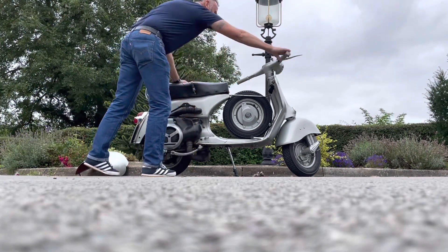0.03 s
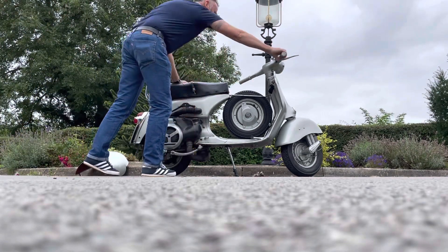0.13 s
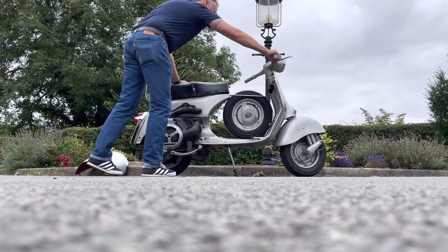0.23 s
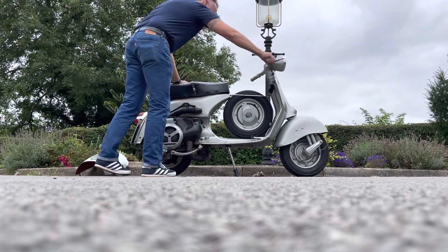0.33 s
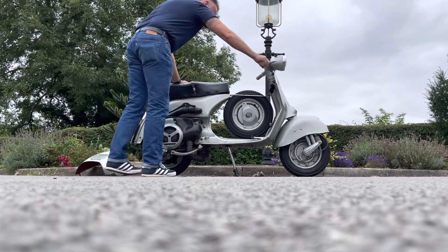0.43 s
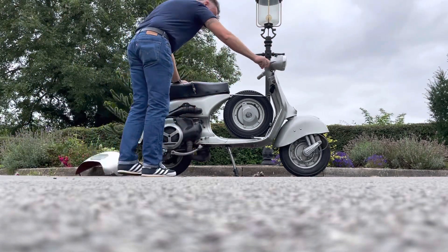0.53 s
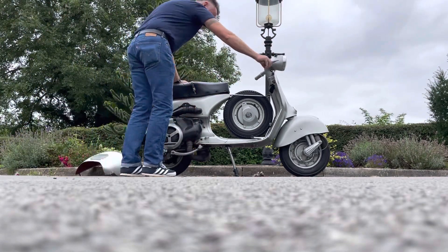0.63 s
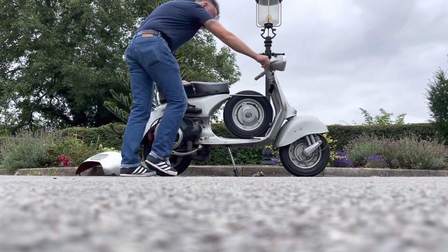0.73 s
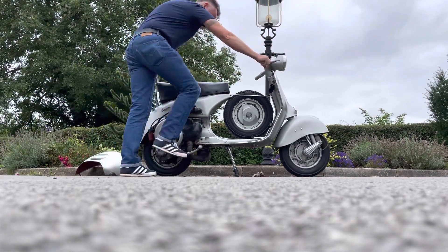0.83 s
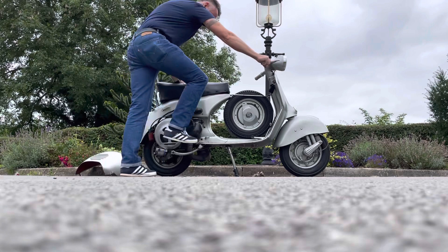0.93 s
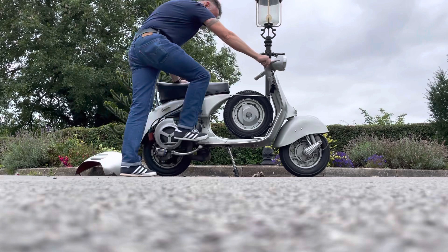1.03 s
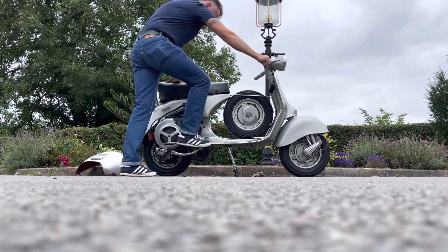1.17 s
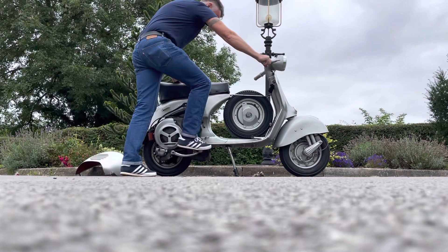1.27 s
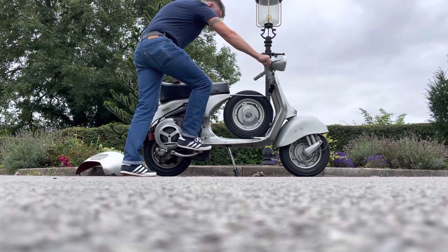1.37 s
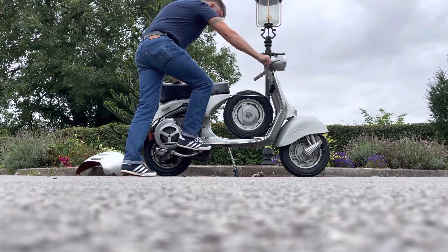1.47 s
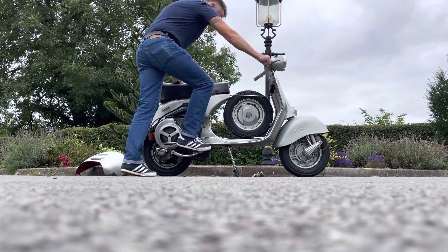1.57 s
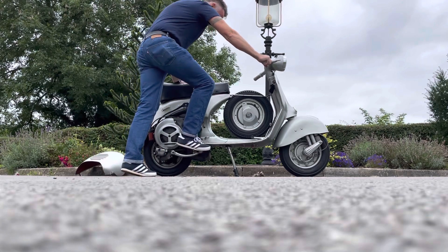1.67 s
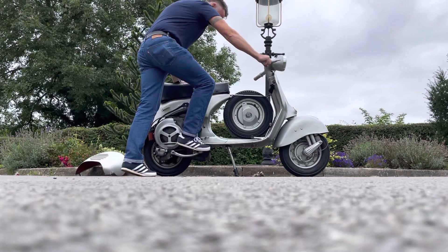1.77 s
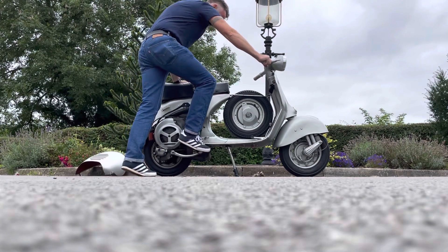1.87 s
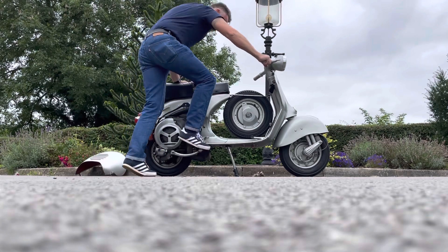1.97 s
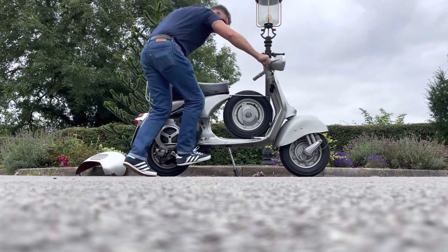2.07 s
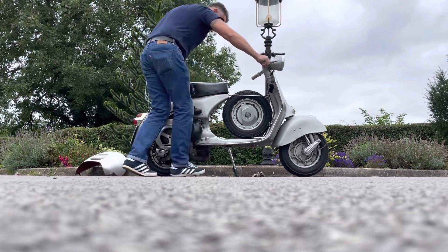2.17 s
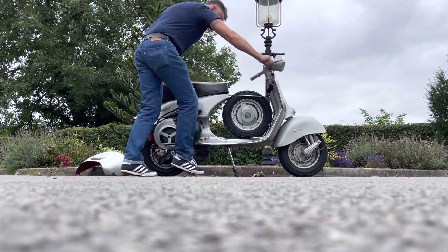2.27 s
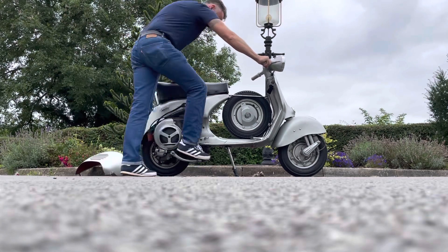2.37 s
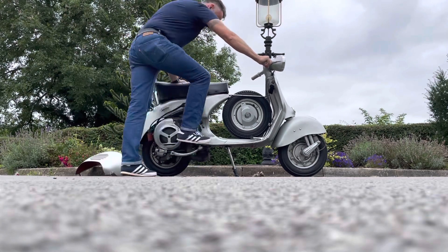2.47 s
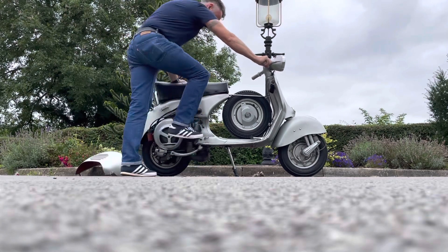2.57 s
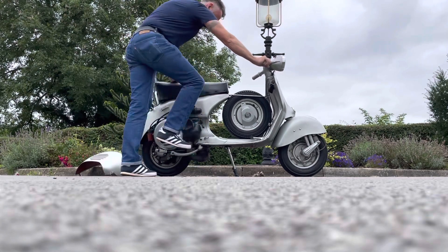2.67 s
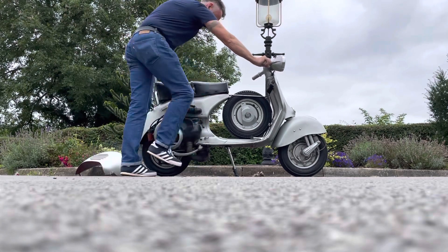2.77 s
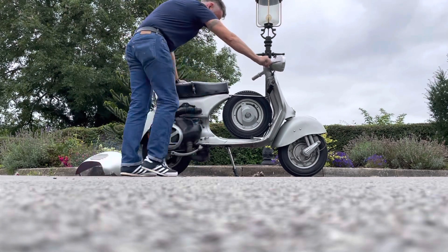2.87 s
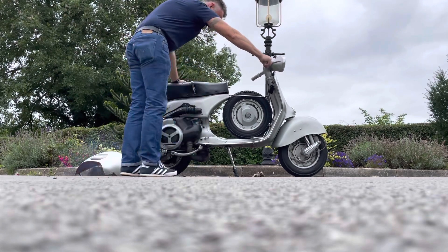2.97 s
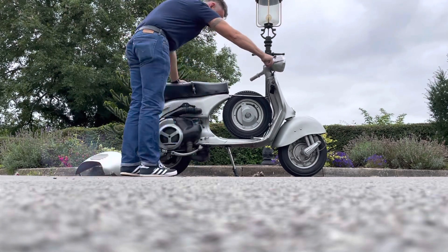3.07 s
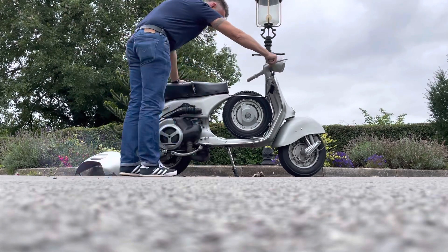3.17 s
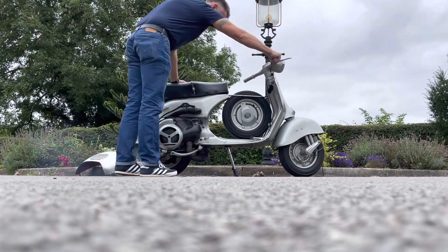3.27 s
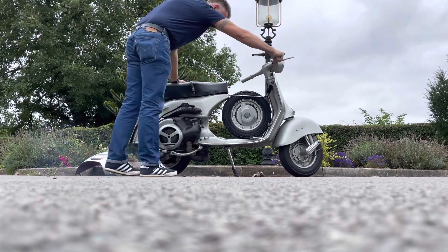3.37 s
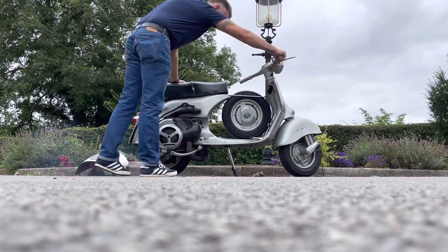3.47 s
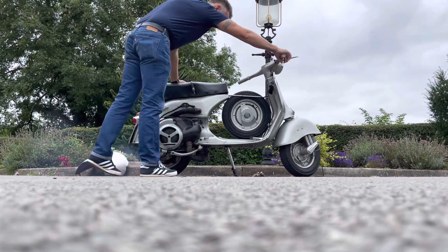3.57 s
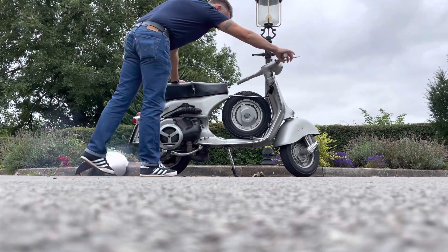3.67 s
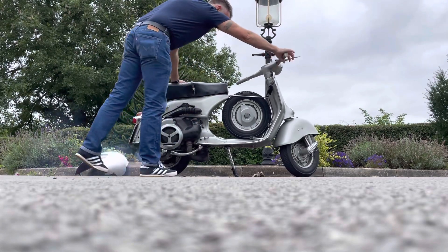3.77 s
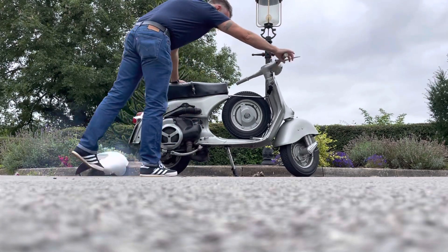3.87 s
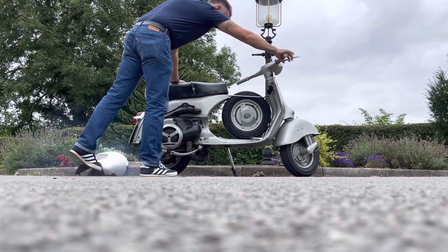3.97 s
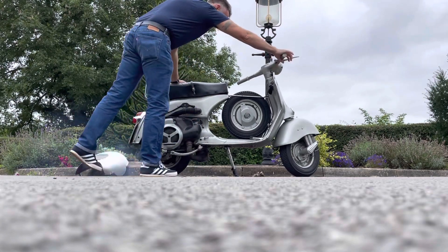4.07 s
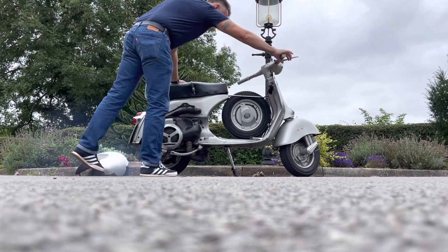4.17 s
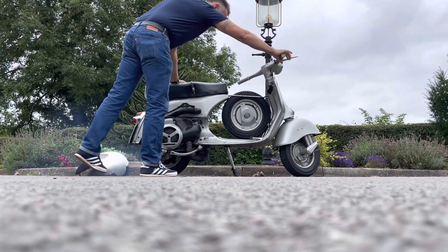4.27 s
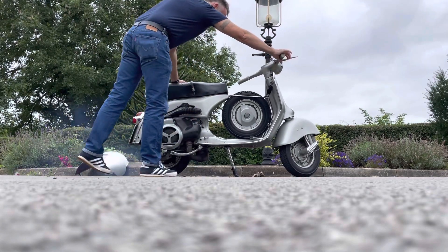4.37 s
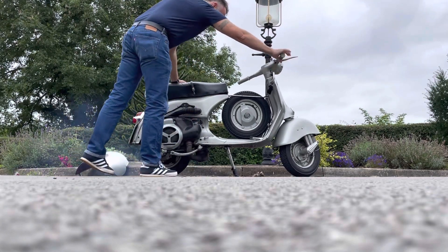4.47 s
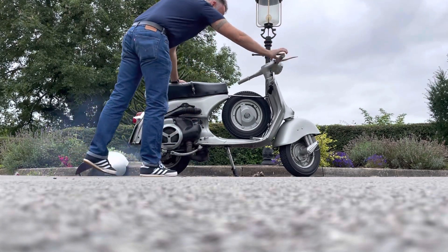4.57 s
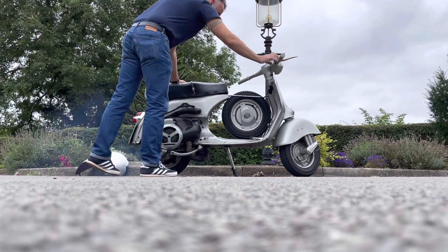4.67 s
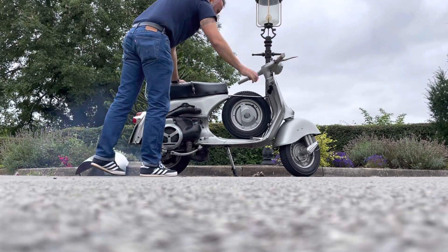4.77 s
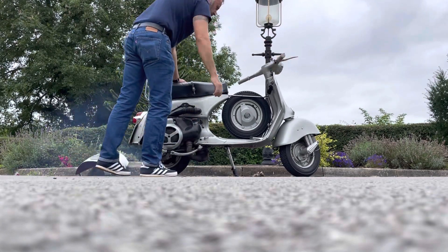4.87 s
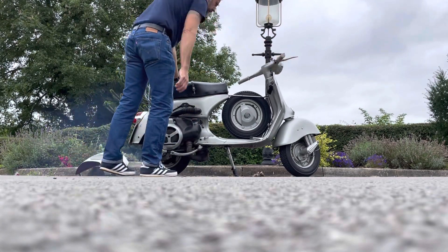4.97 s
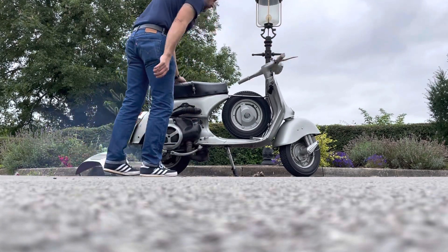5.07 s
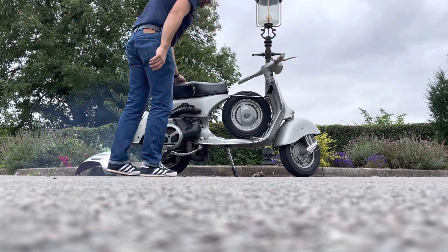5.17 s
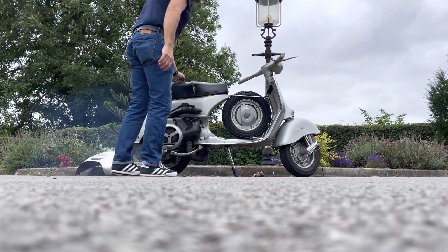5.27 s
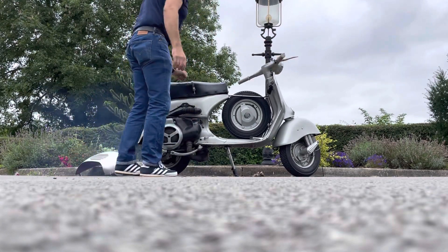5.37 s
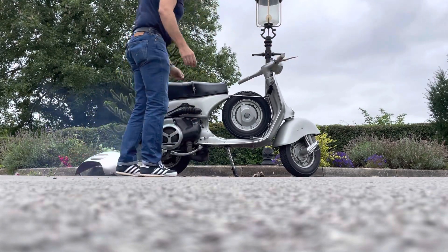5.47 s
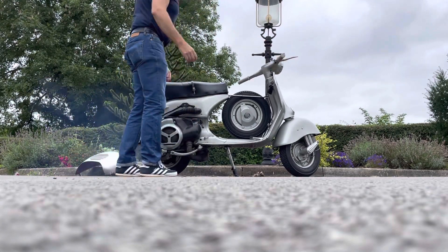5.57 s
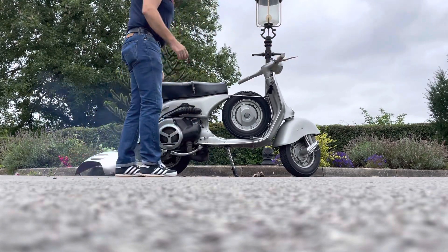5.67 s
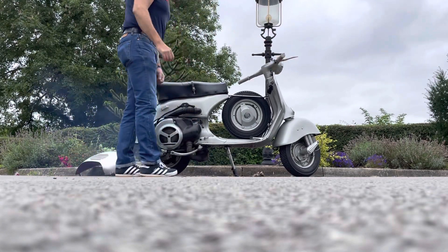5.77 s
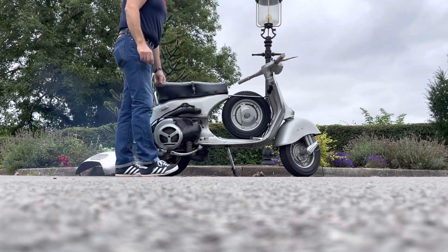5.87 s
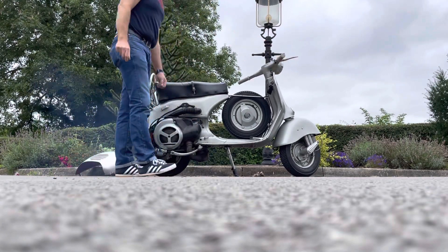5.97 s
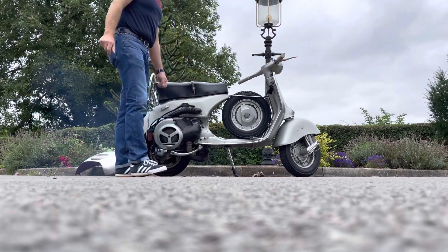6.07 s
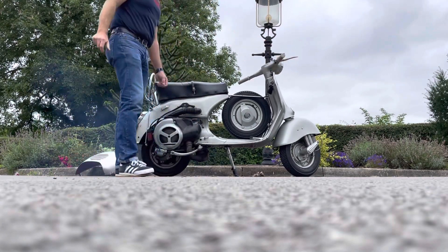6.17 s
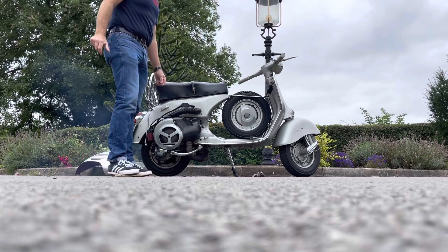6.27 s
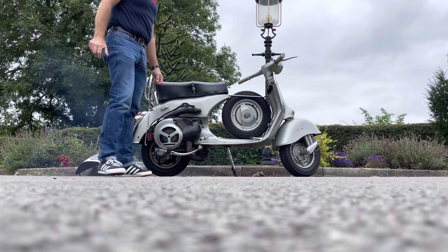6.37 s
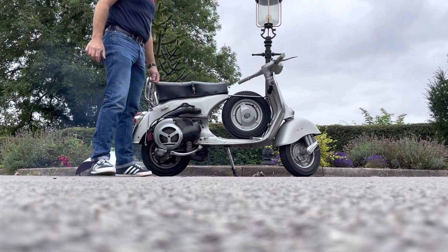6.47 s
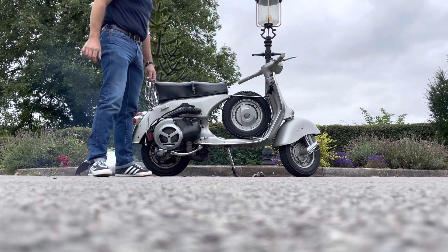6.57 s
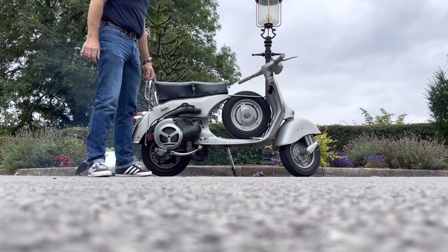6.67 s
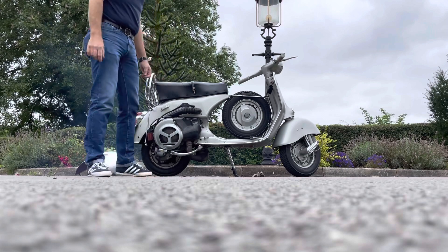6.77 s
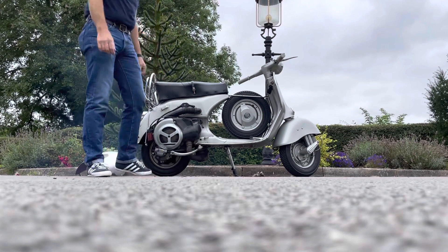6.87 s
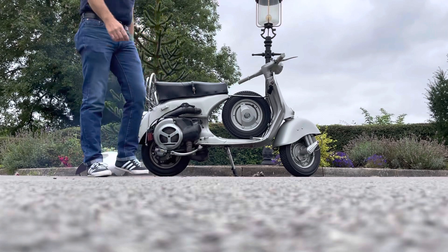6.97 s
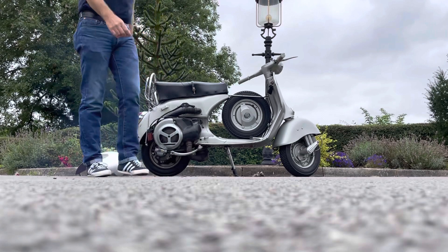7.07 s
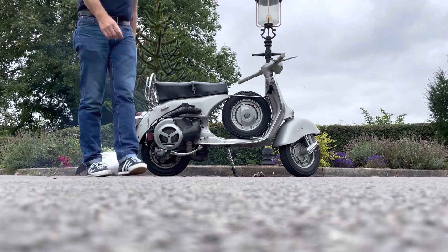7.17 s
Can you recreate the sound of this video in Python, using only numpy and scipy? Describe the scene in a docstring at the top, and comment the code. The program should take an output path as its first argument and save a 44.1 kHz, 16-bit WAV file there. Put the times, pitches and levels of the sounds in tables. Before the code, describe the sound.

Outdoors by a quiet road, thin bird whistles and distant rumble sit under sole scuffs and small metal knocks. A sharp kick-start clack turns over a two-stroke scooter; it catches with a jolt and ratchet buzz, revs once into a rough drone, then slows to a puttering, clattering idle with irregular pops. Close stereo pickup, little echo.

```python
"""Distant birds whistle over a far-off street rumble while a rider's soles scuff and trousers rustle by an old scooter.
Shoe and kick lever knock; the kick spins the two-stroke crank, it knocks, the engine catches and the ratchet buzzes.
It revs once, a run of firings over a rough harmonic drone, then coasts down to idle with only stray firings.
Every turn pumps the exhaust, gulps through the intake and slaps the piston: pulses and noise through resonances.
A firing adds a spit at the exhaust joint, a bark in the pipe and a thump; the loudness follows crank speed."""
import sys
import numpy as np
from scipy import signal
from scipy.fft import rfft, irfft
from scipy.io import wavfile
from scipy.ndimage import uniform_filter1d

SR = 44100
rng = np.random.default_rng(int(sys.argv[2]) if len(sys.argv) > 2 else 0)


def store_pcm(level_fs):
    """Save levels as 16-bit WAV."""
    pcm = np.round(np.clip(level_fs, -1, 1) * 32767).astype(np.int16)
    wavfile.write(sys.argv[1], SR, np.atleast_2d(pcm).T)


N = 317961
TIME = np.arange(N) / SR

# all table levels are relative
# pressed steel body modes: (frequency [Hz], level [dB], t60 [s])
BODY_MODES = [(204.5, -3, 0.23), (282.5, 2, 0.15), (427, 0.5, 0.16), (547, -8, 0.29), (696, -10.5, 0.17)]
# bright spectrum of clicks, rustle and faint hiss: (frequency [Hz], level [dB])
CLICK_SPECTRUM = [(800, 11.5), (2000, 9.5), (3200, 5.5), (5000, 7), (7000, 3), (8500, -7), (10500, -0.5),
                  (16000, -37)]

IDLE_TPS = 20  # reference crank speed, turns per second
KICK_S, CATCH_S = 2.015, 2.161  # kick starts the crank; engine catches
# one twist of the throttle
BLIP = dict(start_s=2.492, attack_s=0.23, hold_s=0.17, release_s=0.12)


def amp(db):
    """Decibels to gain."""
    return 10 ** (np.asarray(db) / 20)


def unit(x):
    """Scale to rms 1."""
    return x / np.sqrt(np.mean(x ** 2))


def noise():
    """White noise."""
    return rng.standard_normal(N)


def grit(spread_db):
    """Dense tiny impacts: noise whose level steps at random every 20 samples."""
    steps = amp(spread_db * rng.standard_normal(N // 20 + 1))
    return unit(noise() * np.repeat(steps, 20)[:N])


def convolve(x, response):
    """Pass a sound through an impulse response."""
    return signal.fftconvolve(x, response)[:N]


def colour(x, spectrum, size=8192):
    """Minimum-phase filter of unit energy through (Hz, dB) points."""
    hz, db = np.transpose(spectrum)
    grid_hz = np.maximum(np.fft.rfftfreq(size, 1 / SR), 1)
    gain_db = np.interp(np.log(grid_hz), np.log(hz), db)
    # folding the cepstrum makes the response causal
    cepstrum = irfft(np.log(amp(gain_db)))
    cepstrum[1:size // 2] *= 2
    cepstrum[size // 2 + 1:] = 0
    response = irfft(np.exp(rfft(cepstrum)))
    return convolve(x, response / np.linalg.norm(response))


def ring(x, modes):
    """Decaying sines (Hz, dB, t60 s) of alternating sign and unit summed energy, struck by x."""
    t = TIME[:SR // 2]
    response = np.zeros(len(t))
    for k, (hz, db, t60_s) in enumerate(modes):
        response += amp(db - 60 * t / t60_s) * np.sin(2 * np.pi * hz * t) * (-1) ** k
    return convolve(x, response / np.linalg.norm(response))


def smear(fall_s):
    """Response of many short paths that spread a sound in time with little colour; unit energy."""
    t = TIME[:SR // 16]
    paths = rfft(rng.standard_normal(len(t)) * np.exp(-t / fall_s))
    response = irfft(paths / np.sqrt(uniform_filter1d(abs(paths) ** 2, size=5)))
    return response / np.linalg.norm(response)


def pulses(times, sizes):
    """One click of the given size at each time."""
    index = (np.asarray(times) * SR).astype(int)
    return np.bincount(np.maximum(index, 0), sizes, N)[:N]


def bursts(times, db, rise_s, fall_s):
    """Envelope that swells up to each time and dies away after it."""
    t = np.arange(-SR // 4, SR // 4) / SR
    shape = np.exp(np.where(t < 0, t / rise_s, -t / fall_s))
    return signal.fftconvolve(pulses(times, amp(db)), shape, "same")


def swell(start_s, attack_s, hold_s, release_s):
    """Envelope that rises smoothly, holds and dies away."""
    t = TIME - start_s
    rise = np.sin(np.pi / 2 * np.clip(t / attack_s, 0, 1)) ** 2
    return rise * np.exp(-np.maximum(t - attack_s - hold_s, 0) / release_s)


def wide(x, side_db):
    """Early scatter off road and bodywork differs between left and right, less so in the bass."""
    t = TIME[:SR // 60]
    scatter = rng.standard_normal(len(t)) * np.exp(-t / 0.005)
    scatter = signal.sosfilt(signal.butter(1, 220, "high", fs=SR, output="sos"), scatter)
    side = amp(side_db) * convolve(x, scatter / np.linalg.norm(scatter))
    return np.array([x + side, x - side])


def roadside(x, wet_db, t60_s):
    """Hedges and trees scatter back a thin, dull tail."""
    t = TIME[:SR]
    tails = rng.standard_normal((2, SR)) * np.exp(-np.log(1000) * t / t60_s) * (t > .012)
    dull = signal.sosfilt(signal.butter(1, 4000, fs=SR, output="sos"), x.mean(axis=0))
    echoes = np.array([convolve(dull, tail / np.linalg.norm(tail)) for tail in tails])
    return x + amp(wet_db) * echoes


def street():
    """Far-off rumble: coloured noise at a slowly changing level."""
    # (frequency [Hz], level [dB])
    rumble_spectrum = [(20, -13), (50, 15.5), (95, 12.5), (160, 3.5), (400, -7.5), (900, -14.5),
                       (2000, -29), (3500, -25), (7000, -76), (16000, -47)]
    # (time [s], level [dB])
    rumble_level = [(0, -54.5), (.5, -57.5), (1.1, -59), (2, -58.5)]
    gain = amp(np.interp(TIME, *np.transpose(rumble_level)))
    return wide(gain * colour(noise(), rumble_spectrum), -4.9)


def birds(waver=0.012, attack_s=0.008):
    """Thin wavering whistles from the trees: sines that start quickly, bend and fade."""
    # before waver: (start [s], length [s], start [Hz], middle [Hz], end [Hz], level [dB])
    whistles = [(0, 0.37, 8000, 7880, 7740, -51.5), (.383, .05, 3260, 3370, 3430, -61),
                (0.392, 0.025, 2590, 2690, 2900, -58), (0.407, 0.046, 2860, 2730, 2550, -50),
                (.427, .022, 3600, 3540, 3250, -55), (0.45, 0.068, 3120, 2990, 2720, -50.5),
                (0.476, 0.03, 3500, 3700, 3400, -54), (.53, .07, 2530, 2720, 2600, -62),
                (.575, 0.13, 2350, 2430, 2230, -67), (.95, .06, 3550, 3560, 3570, -73),
                (1.108, .07, 3370, 3390, 3400, -74), (1.415, .05, 3380, 3370, 3360, -78)]
    out = np.zeros(N)
    for start_s, length_s, from_hz, via_hz, to_hz, db in whistles:
        t = TIME[:int(length_s * SR)]
        glide_hz = np.interp(t / length_s, [0, .5, 1], [from_hz, via_hz, to_hz])
        flutter = unit(uniform_filter1d(noise(), size=100))[:len(t)]
        pitch_hz = glide_hz * (1 + waver * flutter)
        shape = np.clip(t / attack_s, 0, 1) * (1 - t / length_s)
        start = max(int(start_s * SR), 0)
        out[start:start + len(t)] += amp(db) * shape * np.sin(2 * np.pi * np.cumsum(pitch_hz) / SR)
    return wide(out, -7)


def movements(table, attack_share=0.32, release_s=0.065):
    """Summed envelopes of (start s, length s, dB) movements: swell, hold, then die away."""
    envelope = np.zeros(N)
    for start_s, length_s, db in table:
        attack_s = attack_share * length_s
        envelope += amp(db) * swell(start_s, attack_s, (1 - attack_share) * length_s, release_s)
    return envelope


def shuffle(hiss_db=-86, body_db=-3):
    """Soles scuff asphalt and the body rings; a faint steady hiss lies underneath; trousers rustle as a leg swings."""
    # (start [s], length [s], level [dB])
    sole_moves = [(.1, 0.087, -58), (.34, 0.16, -51.5), (.74, 0.13, -66), (1.17, 0.043, -53.5)]
    # (start [s], length [s], level [dB])
    leg_moves = [(0, 0.037, -74), (.22, 0.2, -72), (.68, 0.24, -71.5)]
    # (frequency [Hz], level [dB])
    scuff_spectrum = [(30, 7.5), (60, -7), (130, -8), (210, -1), (320, -12), (480, -6), (900, -14),
                      (2000, -42), (6000, -46)]
    rubbing = movements(sole_moves) * grit(spread_db=6.0)
    scuff = amp(0.5) * colour(rubbing, scuff_spectrum) + amp(body_db) * ring(rubbing, BODY_MODES)
    rustle_and_hiss = (movements(leg_moves) + amp(hiss_db)) * colour(noise(), CLICK_SPECTRUM)
    return wide(scuff + rustle_and_hiss, -8.0)


def knocks():
    """Noise bursts and struck modes: shoe and lever knock and click, then the engine's knocks as it starts."""
    # from 2.094 s compression knocks of the cranked engine, at 2.162 s the catch jolt, at 2.294 s a ratchet snag
    # (time [s], knock [dB], bright click [dB], lever ring [dB], hollow thud [dB])
    knock_events = [(0.114, -46, -54, -59, -37), (0.204, -48, -41.5, -61, -63), (0.218, -38, -47, -57, -55),
                    (0.354, -42, -44.5, -65, -47), (0.568, -44, -62, -68, -56), (0.681, -40, -69, -47, -52),
                    (1.148, -39, -75, -66, -51), (1.183, -30.5, -40, -54, -52),
                    (1.205, -30.5, -67, -55, -41), (1.27, -58, -55, -70, -62),
                    (1.325, -38.5, -66, -67, -55), (1.581, -20.5, -24, -54, -52),
                    (1.786, -34, -58, -35.5, -49), (1.932, -45, -65, -57, -60),
                    (1.9816, -23.5, -33, -44, -52), (1.9996, -13, -12, -31, -40),
                    (2.094, -23, -28, -50, -45), (2.105, -24, -26, -48, -30), (2.132, -20, -33, -45, -31),
                    (2.162, -9.5, -16, -18, -28), (2.294, -8, -18, -40, -43)]
    # (frequency [Hz], level [dB])
    knock_spectrum = [(80, -60), (250, 1), (450, -0.5), (800, 7), (1200, 0), (2000, -17), (3500, -14),
                      (8000, -33)]
    # (frequency [Hz], level [dB], t60 [s])
    lever_modes = [(477, -5, 0.14), (684, -18, .3), (1028, -9, .27), (1130, -3, 0.18), (1196, 2, 0.27),
                   (1295, -6, .15), (1362, 3, 0.091), (1374, -12, .28), (1960, -18, .17)]
    s, knock_db, click_db, ring_db, thud_db = np.transpose(knock_events)
    impact = bursts(s, knock_db, rise_s=0.0003, fall_s=0.009) * noise()
    rattle = bursts(s + 0.014, knock_db, rise_s=0.0029, fall_s=0.025) * grit(spread_db=5.5)
    knock = colour(impact + amp(-10.5) * rattle, knock_spectrum)
    click = colour(bursts(s, click_db, rise_s=1 / 8000, fall_s=0.0081) * noise(), CLICK_SPECTRUM)
    rough = bursts(s, ring_db, rise_s=1 / 8000, fall_s=0.028) * grit(spread_db=0)
    lever = ring(pulses(s, amp(ring_db)) + amp(-25.5) * rough, lever_modes)
    body = ring(bursts(s, thud_db, rise_s=1 / 2000, fall_s=0.0063) * noise(), BODY_MODES)
    return wide(amp(-12.0) * knock + amp(-8.5) * click + amp(15) * lever + body, -12.0)


def ratchet(from_s=2.161, to_s=2.448, end_db=-17, rise_db_per_s=25):
    """The pawl skips over the teeth, unevenly, ever faster and louder, until the foot lets the lever back."""
    # (frequency [Hz], level [dB])
    pawl_spectrum = [(200, 2), (450, 5.5), (700, 9.5), (1300, -1.5), (2200, -6.5), (4000, -6.5), (6300, -8),
                     (8300, -19), (10300, -8.5), (13000, -23), (16000, -52)]
    # (frequency [Hz], level [dB], t60 [s])
    ratchet_modes = [(4810, 1, 0.02), (5190, 6, 0.014), (5430, -7, 0.02), (6100, 3, 0.024),
                     (6330, -3, 0.014)]
    teeth_per_s = np.interp(TIME, [from_s, to_s], [79, 164.6], left=0, right=0)
    s = TIME[1:][np.diff(np.floor(np.cumsum(teeth_per_s) / SR)) > 0]
    chance = rng.standard_normal((len(s), 2))
    db = end_db - rise_db_per_s * (to_s - s) + 1.7 * chance[:, 1]
    teeth = bursts(s + 0.0007 * chance[:, 0], db, rise_s=0.00022, fall_s=0.0055) * grit(spread_db=1.5)
    return wide(colour(teeth, pawl_spectrum) + amp(-10.5) * ring(teeth, ratchet_modes), -16)


def speed(s):
    """Crank turns per second at the given times, before the surges."""
    # (time [s], crank speed [turns/s])
    crank_speed = [(2, 14), (2.2, 24), (2.62, 24), (2.7, 29), (2.8, 39), (2.9, 49), (3, 50), (3.35, 44),
                   (3.9, 37), (4.4, 31.5), (4.9, 26), (5.2, 22), (6.4, 21.5), (6.6, 19.5), (7.2, 19)]
    return np.interp(s, *np.transpose(crank_speed))


def with_speed(s, idle_db, doubling_db):
    """Gain of a part that grows louder with crank speed, in dB per doubling."""
    return amp(idle_db + doubling_db * np.log2(speed(s) / IDLE_TPS))


def all_firings():
    """Columns (s, spit dB, thump dB) of the stray firings and the rev, which fires every turn, in time order."""
    # (time [s], spit [dB], thump [dB])
    stray_firings = [(2.139, -58, -20), (2.1902, -15.5, -14.5), (2.2716, -13, -20), (2.4729, -14.5, -39),
                     (2.598, -13.5, -21.5), (3.0514, -5, -18.5), (3.2198, -7.5, -14), (3.4683, -18.5, -18),
                     (3.5835, -11.5, -18.5), (3.7587, -18, -15), (3.9743, -7.5, -14.5), (4.233, -12, -13),
                     (4.5186, -14, -19), (4.7638, -12, -14.5), (4.9922, -11.5, -19), (5.2037, -17.5, -36),
                     (5.2953, -15, -19.5), (5.5192, -20, -31), (5.7157, -15, -18), (5.9937, -14.5, -20),
                     (6.2816, -13, -15), (6.5114, -12.5, -25), (6.7164, -13, -22), (6.936, -14.5, -26),
                     (7.1468, -9.5, -30)]
    rev_s, rev_turns, rev_spit_db, rev_thump_db = 2.6787, 10, -12.5, -17.5
    # each rev firing speeds the crank by one step, up to a top speed
    from_tps, step_tps, top_tps = 28.9, 2.85, 48.2
    rates_tps = np.minimum(from_tps + step_tps * np.arange(rev_turns - 1), top_tps)
    rev_times = rev_s + np.append(0, np.cumsum(1 / rates_tps))
    rev = [(s, rev_spit_db, rev_thump_db) for s in rev_times]
    rows = np.vstack([stray_firings, rev])
    return rows[np.argsort(rows[:, 0])].T


def crank(surge_share=.13):
    """Port opening times: the crank surges after a firing, coasts, and makes whole turns between firings."""
    fired = all_firings()[0]
    coast = np.interp(TIME, fired, np.arange(len(fired))) % 1
    # the flywheel smooths the surge at speed
    surge = surge_share * (IDLE_TPS / speed(TIME)) ** 2 * (.5 - coast)
    angle = np.cumsum(speed(TIME) * (1 + surge)) / SR
    marks = np.interp(fired, TIME, angle)
    # four turns ahead of the first firing, one after the last
    marks = np.concatenate([[marks[0] - 4], marks, [marks[-1] + 1]])
    turns = np.concatenate([[0], np.cumsum(np.round(np.diff(marks)))])
    open_angles = np.interp(np.arange(turns[-1] + 1), turns, marks)
    return np.interp(open_angles, angle, TIME)


def stroke(opens, share, scatter_db, jitter_s, lag_s=0):
    """Time and dB of a once-a-turn event, a share of the turn and a fixed lag after the port opens."""
    period = np.diff(opens)
    chance = rng.standard_normal((len(period), 2))
    times = opens[:-1] + share * period + lag_s + jitter_s * chance[:, 0]
    return times, 10 * np.log10(period) + scatter_db * chance[:, 1]


def blow(times, db, rough, fall_s):
    """A knock rattles on along the same paths every turn; a turbulent share of it is new each time."""
    steady = unit(convolve(pulses(times, amp(db)), smear(fall_s)))
    turbulent = unit(bursts(times, db, 0.0023, fall_s) * noise())
    return unit(steady + rough * turbulent)


def running(cranking_db=-6, rise_db_per_s=30, catch_rise_s=0.003):
    """Gain of the turning engine: cranking grows louder as the kick goes down, full level at the catch."""
    cranking = cranking_db + rise_db_per_s * np.minimum(TIME - CATCH_S, 0)
    uncaught = 1 - np.clip((TIME - CATCH_S) / catch_rise_s, 0, 1)
    return (TIME > KICK_S) * amp(cranking * uncaught)


def leak_hiss():
    """Late in each turn gas hisses past the joints."""
    # (frequency [Hz], level [dB])
    hiss_spectrum = [(1000, -35), (3000, 3), (4500, 17.5), (5400, 12.5), (6900, 13), (8000, -3), (9200, 11),
                     (10800, 1.5), (13000, 5), (15700, -20)]
    leak = unit(bursts(*stroke(crank(), share=.95, scatter_db=2.5, jitter_s=0.0016), rise_s=0.012, fall_s=0.008))
    gain = running() * with_speed(TIME, idle_db=-32.5, doubling_db=5.16)
    return wide(amp(-19.0) * colour(leak * grit(spread_db=-0.5), hiss_spectrum) * gain, -13)


def clatter():
    """The piston slaps its wall near the top: case and fins ring, the skirt ticks, gears and bearings churn."""
    # slap hardness as the engine runs down and hunts: (time [s], level [dB])
    slap_level = [(2.2, 1), (2.6, -1), (2.69, 8), (2.8, 3), (2.95, 1.5), (3.1, 1), (3.7, 1), (4.2, 0),
                  (4.85, -2.5), (5.3, -1.5), (5.7, 0.5), (6.1, 2), (6.37, 4), (6.72, 1), (6.95, -0.5),
                  (7.2, -1)]
    # (frequency [Hz], level [dB])
    case_spectrum = [(100, -23), (220, 0), (400, 6.5), (480, 4), (750, 4), (930, 1), (1130, 5), (1265, -1),
                     (1360, 1.5), (1650, -4), (2100, -8.5), (3000, -12), (3500, -11), (5000, -22),
                     (7000, -24), (11000, -29), (16000, -49)]
    # (frequency [Hz], level [dB])
    tick_spectrum = [(400, -9), (900, -6), (1300, 1), (2100, -7), (2900, 10.5), (3500, -5.5), (4700, 0),
                     (9000, -27)]
    # cooling fins: (frequency [Hz], width [Hz], level [dB])
    fin_resonances = [(1847, 60, 12.5), (2242, 76, 11.5), (2570, 50, 12), (2905, 107, 13), (3094, 94, 8.5),
                      (3600, 85, -8), (3670, 110, -1.5), (4064, 180, 11), (4660, 68, 3), (6760, 120, 3)]
    slow = IDLE_TPS / speed(TIME)
    slaps = stroke(crank(), share=.65, scatter_db=1.7, jitter_s=.0003)
    hard = amp(np.interp(TIME, *np.transpose(slap_level))) * slow
    churn = grit(spread_db=1.5)
    case = colour(blow(*slaps, rough=slow, fall_s=0.039) + churn, case_spectrum)
    strike = blow(*slaps, rough=1.14, fall_s=0.012) * hard + amp(-3.0) * noise()
    fin_modes = [(hz, db, np.log(1000) / (np.pi * width_hz)) for hz, width_hz, db in fin_resonances]
    fins = ring(strike, fin_modes)
    skirt = blow(*slaps, rough=1.2, fall_s=0.014) * grit(spread_db=0)
    tick = colour(skirt, tick_spectrum) * hard
    metal = amp(-1.5) * case + amp(-9) * fins + amp(-10) * tick
    return wide(metal * running() * with_speed(TIME, idle_db=-32.5, doubling_db=5.16), -13)


def putts(gulps, opens):
    """Each gulp rings the intake duct at one of its tunings, a little higher or lower from turn to turn."""
    # (frequency [Hz] before detuning, level [dB], t60 [s])
    duct_modes = [(529.6, -0.5, 0.063), (633.5, 1, 0.05), (665, -7, 0.04), (801, -7.5, 0.066)]
    detune = (.92, 1, 1.09)
    choice = rng.integers(0, len(detune), len(opens) + 1)[np.searchsorted(opens, TIME)]
    out = np.zeros(N)
    for k, ratio in enumerate(detune):
        out += ring(gulps * (choice == k), [(hz * ratio, db, t60_s) for hz, db, t60_s in duct_modes])
    return out


def intake(tune_tps=31.2, tune_octaves=0.22, tune_db=4.5):
    """Each gulp rings the duct with a putt and air rushes in after it; one crank speed is in tune."""
    # (frequency [Hz], level [dB])
    rush_spectrum = [(100, -42), (250, -9), (330, -8.5), (400, 3), (470, -4.5), (600, 3), (800, -2),
                     (930, -11), (1120, -9.5), (1280, -18.5), (3000, -39), (8000, -78)]
    opens = crank()
    gulp = blow(*stroke(opens, share=0, scatter_db=1.2, jitter_s=.0003, lag_s=.012), rough=0.3, fall_s=.0025)
    rush = blow(*stroke(opens, share=0, scatter_db=1.0, jitter_s=.0001, lag_s=.0165), rough=0.97, fall_s=0.0072)
    in_tune = np.exp(-(np.log2(speed(TIME) / tune_tps) / tune_octaves) ** 2)
    # the open throttle takes the tuning away
    lift = amp(tune_db * in_tune * (1 - swell(**BLIP)))
    gain = running() * with_speed(TIME, idle_db=-29.5, doubling_db=0.8) * lift
    return wide((amp(-5.8) * putts(gulp, opens) + amp(-7.5) * colour(rush, rush_spectrum)) * gain, -11)


def roar(level_db=-20):
    """With the throttle open, each gulp of air sets the air box ringing."""
    # (frequency [Hz], level [dB], t60 [s])
    airbox_modes = [(197, 3.5, 0.062), (228, -1.5, 0.087), (424, -8, 0.066), (820, -13, 0.039)]
    gulps = blow(*stroke(crank(), share=0.1, scatter_db=4.5, jitter_s=0.00036), rough=0.86, fall_s=0.0096)
    return wide(unit(ring(gulps, airbox_modes)) * amp(level_db) * swell(**BLIP), -34)


def exhaust(throttle_db=4.5):
    """Each puff booms in the silencer box, most at low speed, and drives rough gas through the header pipe."""
    # (frequency [Hz], level [dB])
    silencer_spectrum = [(20, -63), (36, -26), (62, -1.5), (88, -2), (130, 2.5), (195, -2.5), (260, 1),
                         (330, -15), (600, 3), (1000, -30), (2500, -91)]
    # (frequency [Hz], level [dB], t60 [s])
    box_modes = [(66, 7, 0.061), (90.6, 11.5, 0.039), (137, -7, 0.024), (176, -3.5, 0.054)]
    # (frequency [Hz], level [dB])
    pipe_spectrum = [(40, -10.5), (90, -21.5), (140, -4.5), (200, -3.5), (260, 0), (330, -10.5),
                     (400, -9.5), (480, -15.5), (620, -12), (820, -19), (1200, -28.5), (2500, -59),
                     (8000, -84)]
    opens = crank()
    # a slow crank runs more raggedly, and its port stays open long enough to boom
    slow = IDLE_TPS / speed(TIME)
    s, db = stroke(opens, share=0, scatter_db=1.8, jitter_s=0.0005, lag_s=0.0021)
    puff = pulses(s, amp(db))
    box = unit(ring(colour(puff, silencer_spectrum), box_modes))
    direct = colour(unit(puff), silencer_spectrum)
    boom = (amp(-4.5) * box + amp(-10.0) * direct) * slow ** 1.45
    gas = blow(*stroke(opens, share=.66, scatter_db=1.8, jitter_s=.00006), rough=1.17 * slow, fall_s=0.025)
    pipe = amp(-5.0) * colour(gas, pipe_spectrum) / slow ** 0.41
    gain = running() * with_speed(TIME, idle_db=-27.5, doubling_db=3) * amp(throttle_db * swell(**BLIP))
    return wide((boom + pipe) * gain, -23)


def drone(scatter_db=3, wobble_turns=.035, count=19):
    """At speed the puffs merge into a rough note, whose overtones swell as they glide through resonances."""
    # exhaust note resonances: (frequency [Hz], level [dB])
    note_spectrum = [(80, -12), (138, 4), (165, -2), (197, 2), (230, -4), (266, 5), (310, -14), (390, -9),
                     (480, -18), (600, -7), (690, -4), (740, -15), (795, -2), (860, -22)]
    opens = crank()
    turns = np.interp(TIME, opens, np.arange(len(opens)))
    tps, note = speed(TIME), np.zeros(N)
    for k in range(2, count):
        size = np.interp(TIME, opens, rng.standard_normal(len(opens)))
        shift = np.interp(TIME, opens, rng.standard_normal(len(opens)))
        db = np.interp(k * tps, *np.transpose(note_spectrum)) + scatter_db * size
        note += amp(db) * np.sin(2 * np.pi * (k * turns + rng.random() + wobble_turns * shift))
    revved = np.clip((TIME - BLIP["start_s"]) / BLIP["attack_s"], 0, 1)
    return wide(unit(note * revved) * with_speed(TIME, idle_db=-45.5, doubling_db=14.5), -35)


def firings():
    """A firing spits at the exhaust joint, barks in the pipe and thumps out of the silencer a moment later."""
    # (frequency [Hz], level [dB])
    spit_spectrum = [(1000, 4), (3000, -4.5), (4500, -1), (5500, 5), (6900, 8), (8000, -12), (9200, 6),
                     (10800, -1.5), (13000, -0.5), (16000, -16)]
    # whistle of the narrow exhaust joint: (frequency [Hz], level [dB], t60 [s])
    gap_modes = [(5650, 0.5, 0.012), (6530, 13.5, 0.0026), (7110, -12.5, 0.013)]
    # (frequency [Hz], level [dB])
    bark_spectrum = [(200, -17), (500, 5), (1050, 7), (1500, 0.5), (1900, 4.5), (2250, -16), (3100, -2),
                     (5000, -35.5)]
    # (frequency [Hz], level [dB])
    thump_spectrum = [(20, -60), (42, 1), (80, 5), (130, 1), (210, -0.5), (290, 3.5), (420, -28),
                      (1500, -43), (8000, -58)]
    s, spit_db, thump_db = all_firings()
    crack = bursts(s + 0.0013, spit_db, rise_s=0.0017, fall_s=0.0076)
    # a slow piston lets gas seep out before the port is fully open
    slow_db = -60 * np.log10(speed(s) / IDLE_TPS)
    seep = amp(-17.5) * bursts(s + 0.00057, spit_db + slow_db, rise_s=0.0061, fall_s=0.0029)
    jet = (crack + seep) * grit(spread_db=2.5)
    spit = amp(-7.5) * colour(jet, spit_spectrum) + amp(-20.5) * ring(jet, gap_modes)
    # the bark follows the strength of the firing and crank speed
    bark_db = (spit_db + thump_db) / 2 + 20 * np.log10(with_speed(s, idle_db=-6, doubling_db=4.65))
    bark = colour(bursts(s + 0.0025, bark_db, rise_s=0.0041, fall_s=0.0066) * noise(), bark_spectrum)
    thump = amp(22.5) * colour(pulses(s + 0.00689, amp(thump_db)), thump_spectrum)
    return wide(spit, -13) + wide(bark, -15) + wide(thump, -24)


def scene():
    """The scooter and its rider, with birds and a far-off street rumble."""
    starting = shuffle() + knocks() + ratchet()
    engine = leak_hiss() + clatter() + intake() + roar() + exhaust() + drone() + firings()
    near = roadside(starting + engine, wet_db=-21.0, t60_s=0.33)
    return street() + roadside(birds(), wet_db=3.0, t60_s=0.48) + near


def record(dry):
    """Two microphone ports differ in level and, in the treble, in phase; lowest bass and top are cut."""
    # between the ports: (frequency [Hz], phase [rad])
    port_phase = [(20, 0), (7400, 0), (7850, 3.1), (8600, 3.2), (9200, 4.2), (10200, 6.2), (11400, 6.4),
                  (12200, 7.8), (12850, 9.3), (13450, 9.5), (14900, 12.5)]
    # (frequency [Hz], left minus right [dB])
    port_balance = [(60, .7), (200, 1.1), (650, 2.8), (1300, 2.1), (3200, 1.7), (4400, .4), (8000, 0)]
    hz = np.fft.rfftfreq(N, 1 / SR)
    turn = np.exp(1j * np.interp(hz, *np.transpose(port_phase)))
    lean = amp(np.interp(hz, *np.transpose(port_balance)) / 2)
    ports = irfft(rfft(dry) * np.array([lean, 1 / (lean * turn)]), N)
    ports = signal.sosfilt(signal.butter(6, 33, "high", fs=SR, output="sos"), ports)
    return signal.sosfilt(signal.ellip(8, .2, 70, 16050, fs=SR, output="sos"), ports)


dry = scene()
out = record(dry)
store_pcm(out)
```